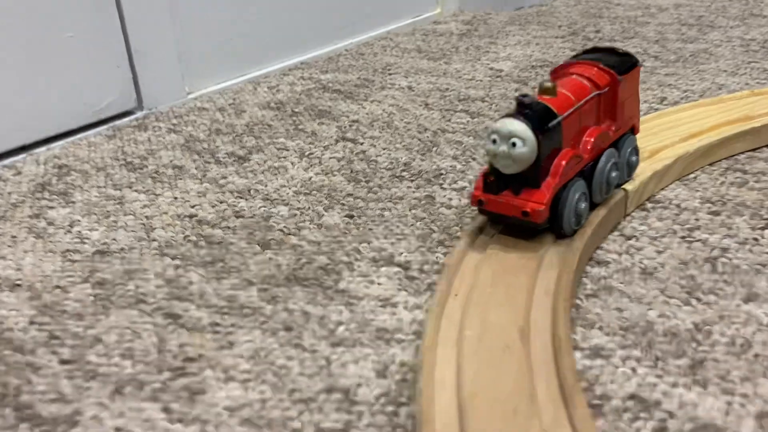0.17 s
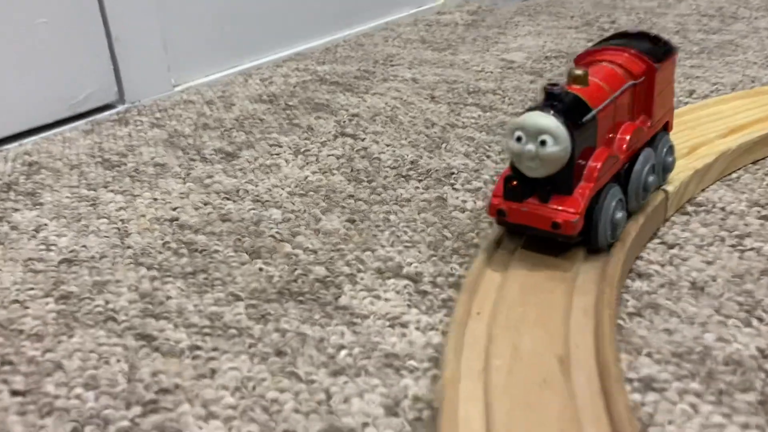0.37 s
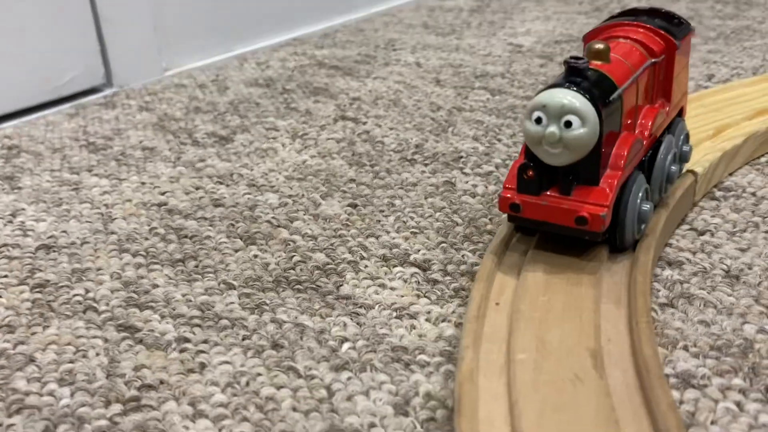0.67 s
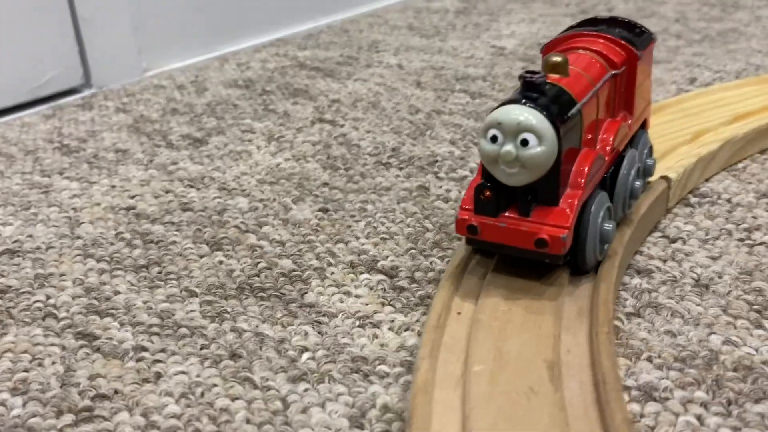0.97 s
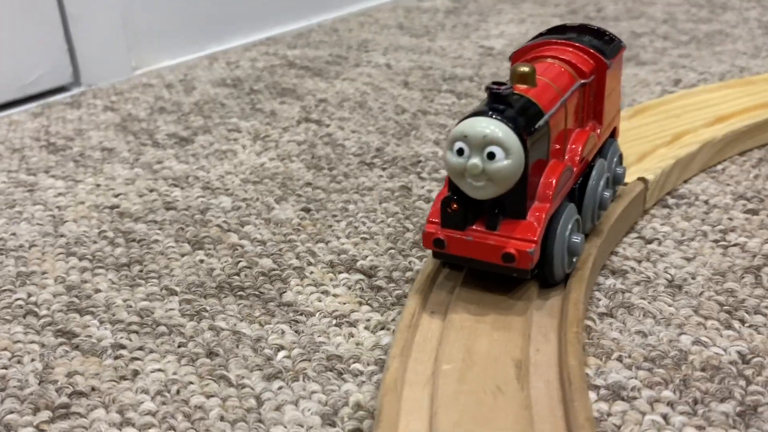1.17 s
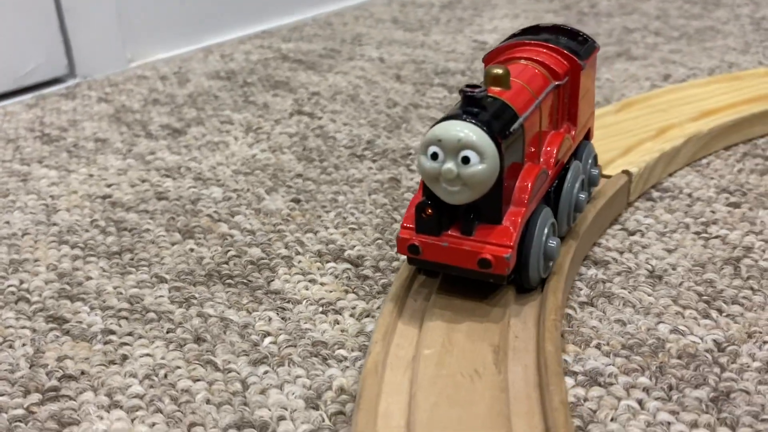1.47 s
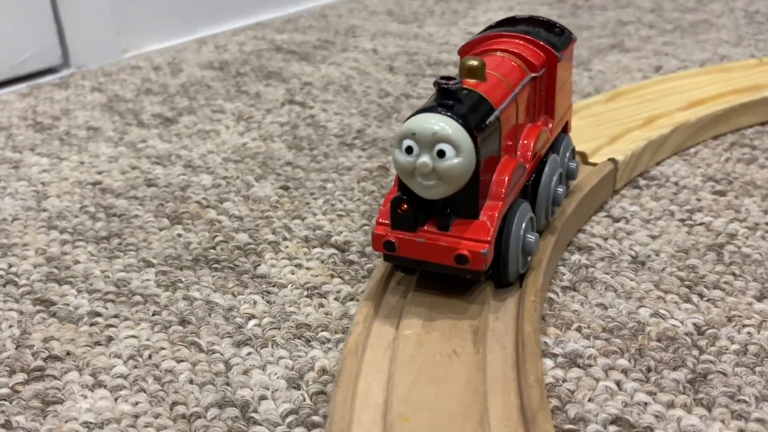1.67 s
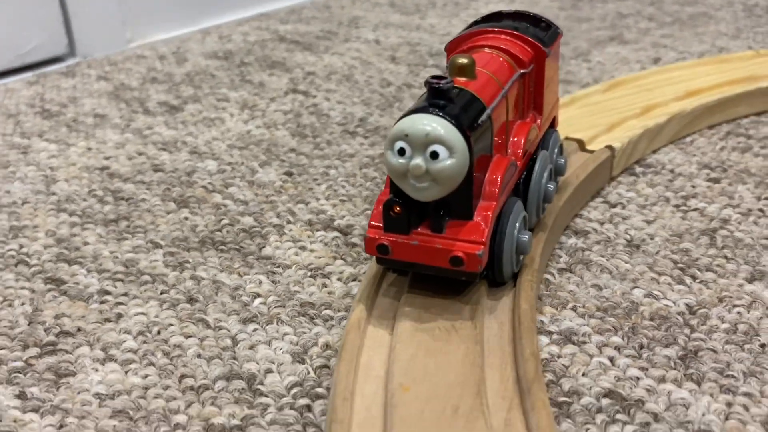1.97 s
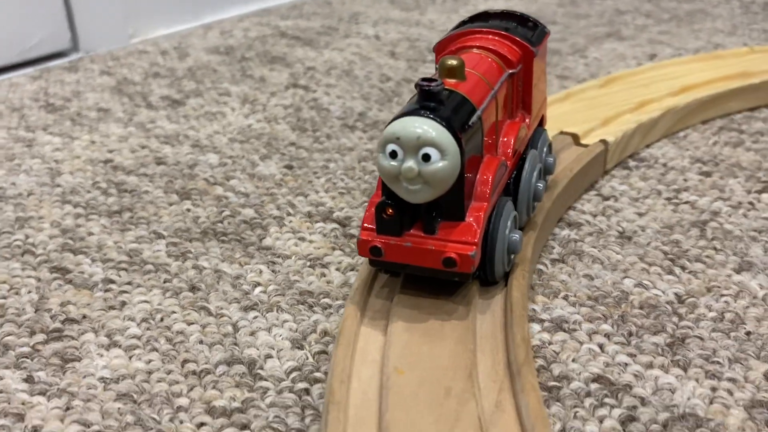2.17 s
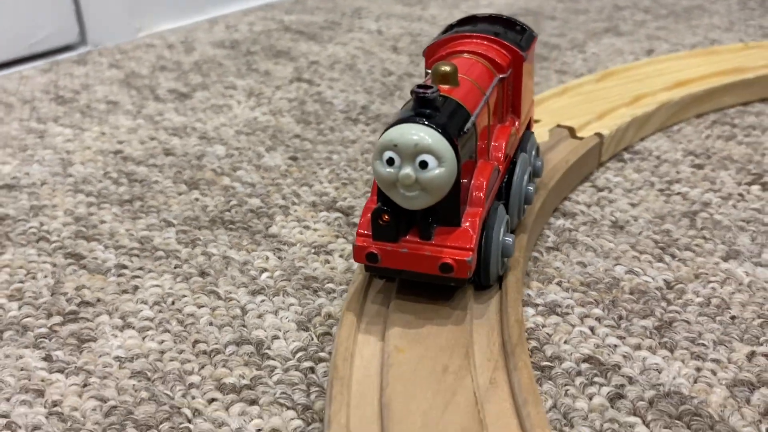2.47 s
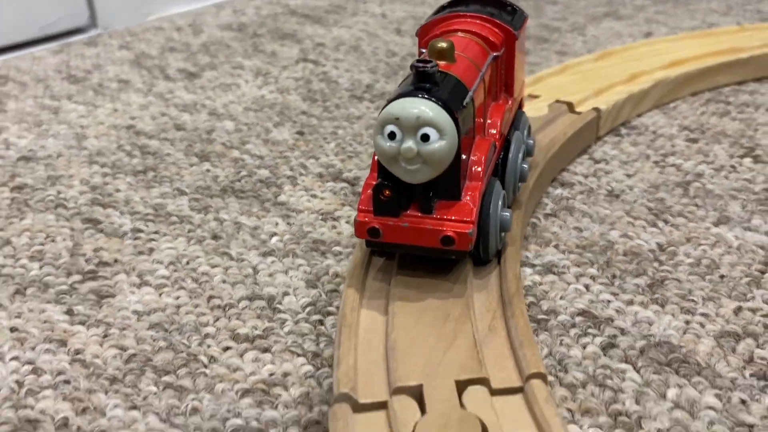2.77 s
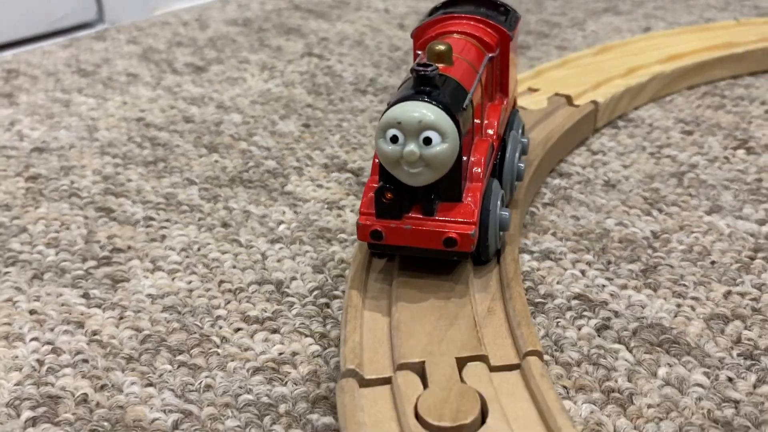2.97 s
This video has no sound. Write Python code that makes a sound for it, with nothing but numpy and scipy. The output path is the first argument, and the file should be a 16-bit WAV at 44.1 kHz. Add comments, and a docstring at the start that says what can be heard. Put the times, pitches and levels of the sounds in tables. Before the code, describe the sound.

A small toy engine's thin motor whir and gritty gear rattle run throughout, swelling early, then ringing brighter later, over soft wheel grumble and low room rumble, heard close from a handheld stereo microphone indoors.

```python
"""On a wooden track laid over carpet, a battery toy engine crawls close to a hand-held stereo camera.
A 24-tooth plastic gear clicks as blows and short scrapes; out of true, it binds twice a turn and chatters.
Tooth-pulsed noise through resonances makes the motor whir in the hollow shell and the chassis rattle.
Wheels grumble as filtered noise and knock as damped tones; hard snaps, dull taps and low bumps
stand out over a low room rumble of shaped noise."""
import sys
import numpy as np
from scipy import signal
from scipy.fft import rfft, irfft, next_fast_len
from scipy.io import wavfile
from scipy.ndimage import uniform_filter1d, map_coordinates

SR = 44100
rng = np.random.default_rng(int(sys.argv[2]) if len(sys.argv) > 2 else 0)


def transcribe(signal):
    """Save signal, clipped to [-1, 1], as a 16-bit WAV file at the path in sys.argv[1]."""
    frames = np.atleast_2d(signal).T
    limited = np.clip(frames, -1, 1)
    pcm = np.round(limited * 32767).astype(np.int16)
    wavfile.write(sys.argv[1], SR, pcm)


N = 137151  # length in samples


def amp(db):
    """Decibels to linear gain."""
    return 10 ** (np.asarray(db) / 20)


def unit(x):
    """Scale to an rms of 1."""
    return x / np.sqrt(np.mean(x ** 2) + 1e-20)


def along(points, hz):
    """Read (Hz, value) points on a log frequency axis."""
    f, value = np.transpose(points)
    return np.interp(np.log(hz + 1), np.log(f + 1), value)


def curves(rows):
    """One value per sample for each column after the time."""
    seconds, *columns = np.transpose(rows)
    return [np.interp(np.arange(N) / SR, seconds, c) for c in columns]


def wobble(rate):
    """A smooth random curve with rate knots a second."""
    knots = rng.standard_normal(int(N * rate / SR) + 4)
    return map_coordinates(knots, [np.arange(N) * rate / SR])


def filtered(x, response):
    """Shape the spectrum of x by a complex response of frequency."""
    m = next_fast_len(N + SR // 2)
    return irfft(rfft(x, m) * response(np.fft.rfftfreq(m, 1 / SR)), m)[..., :N]


def resonant(peaks):
    """Response of parallel resonances, alternating in sign."""
    def response(f):
        total = 0
        for k, (centre, width, db) in enumerate(peaks):
            band = 1j * f * width / (centre * centre - f * f + 1j * f * width)
            total = total + (-1) ** k * amp(db) * band
        return total
    return response


def twice(peaks):
    """The resonances in series with themselves, for steeper skirts."""
    return lambda hz: resonant(peaks)(hz) ** 2


def above(peaks, edge_hz, order=3):
    """The resonances with the bass rolled off below an edge."""
    return lambda hz: resonant(peaks)(hz) * (1j * hz / (edge_hz + 1j * hz)) ** order


def patches(depth_db):
    """White noise pair whose gain varies in patches of time and pitch."""
    z = signal.stft(rng.standard_normal((2, N)), nperseg=1024)[2]
    field = uniform_filter1d(rng.standard_normal(z.shape[1:]), size=4, axis=0)
    field = uniform_filter1d(field, size=4, axis=1)
    return signal.istft(z * amp(depth_db * unit(field)), nperseg=1024)[1][:, :N]


# Drawn phase difference of left over right, which widens and hollows the treble.
# Each row: frequency in Hz, phase difference in radians.
PHASE_SPREAD = [(0, 0.5), (1400, 0.94), (2100, 0.65), (3600, 0.59), (5400, 1.16), (6300, -0.5),
                (7600, 0.58), (8700, -7.5), (9500, -2.5), (10400, -6), (11700, -5), (12700, -16),
                (13900, 13), (14700, -23), (15800, -8)]


def spread_phase(pair):
    """Turn the phase of left by half the drawn difference and of right by minus half."""
    half = lambda hz: .5j * np.interp(hz, *np.transpose(PHASE_SPREAD))
    return filtered(pair, lambda hz: np.exp(half(hz) * [[1], [-1]]))


# Likeness of the noise in left and right.
# Each row: frequency in Hz, left-right correlation from 0 to 1 before the phase spread.
STEREO_LIKENESS = [(60, .8), (600, .8), (1400, .8), (1900, .7), (2400, .9), (4500, .85), (7000, .95),
                   (15000, .93)]


def stereo(gate, colour, patchy_db, blows=0):
    """Gated noise and blows through a colour, rms 1, spread over left and right."""
    def mid_and_side(hz):
        turn = np.arccos(np.clip(along(STEREO_LIKENESS, hz), 0, 1)) / 2
        return colour(hz) * np.array([np.cos(turn), np.sin(turn)])
    source = gate * unit(patches(patchy_db)) + blows * np.array([[1], [0]])  # blows in the middle only
    mid, side = filtered(source, mid_and_side)
    return unit(spread_phase(np.array([mid + side, mid - side])))


# Turns of the gear.
# Each row: mid-turn time in seconds, then levels in dB ahead of the load shaping and panning:
# first bind, second bind, shell ring, chassis rattle.
GEAR_TURNS = [(0.0253, -56.5, -57, -59.5, -63), (0.102, -54.5, -60, -60, -62), (0.1818, -57, -66, -60, -70),
              (0.2619, -53.5, -77, -58.5, -60.5), (0.3444, -52.5, -57, -59, -55.5),
              (0.4324, -53.5, -46.5, -59.5, -53), (0.535, -51.5, -50, -58.5, -56),
              (0.62, -55.5, -66, -56, -76), (0.7, -50, -73, -58, -49.5), (0.7783, -50.5, -53, -56, -59),
              (0.8593, -47, -45.5, -59, -53.5), (0.9431, -51, -45.5, -55.5, -62),
              (1.026, -48, -45, -53, -53), (1.1148, -51.5, -44.5, -52.5, -57),
              (1.2057, -51, -48, -50.5, -56), (1.293, -52.5, -43.5, -50, -53.5),
              (1.3806, -54, -54.5, -49.5, -59.5), (1.4675, -53, -53.0, -50, -58),
              (1.5542, -53.5, -61, -52.5, -57), (1.642, -56, -55, -48.5, -55.5),
              (1.7216, -53.5, -49.5, -49.0, -54), (1.8056, -54.5, -48, -48, -69),
              (1.8884, -52.5, -60, -44.5, -57), (1.9678, -53.5, -48, -47.5, -63),
              (2.0481, -52, -49, -45.5, -58.5), (2.1295, -51, -53, -44.5, -64),
              (2.212, -50.5, -58, -46, -68), (2.294, -50, -49, -46.5, -52.5),
              (2.3792, -52, -51, -48.5, -55.5), (2.4623, -50, -61, -46.5, -54),
              (2.5465, -53.5, -43.5, -48.5, -55.0), (2.6342, -49, -52, -49.5, -51.5),
              (2.7221, -53, -40.5, -55, -55.5), (2.8125, -55.5, -46, -52.5, -55.0),
              (2.904, -55, -54, -53, -51), (2.9999, -55.5, -58, -52, -53.5),
              (3.097, -57.0, -45, -53.5, -58.5)]
TEETH = 24


def gear():
    """Gear angle in turns for each sample, running on evenly before and after the table."""
    s = np.transpose(GEAR_TURNS)[0]
    s = np.r_[2 * s[0] - s[1], s, 2 * s[-1] - s[-2]]
    return np.interp(np.arange(N) / SR, s, np.arange(len(s)) - 1)


def by_turn(turns, db):
    """Glide a level from one mid-turn to the next."""
    return np.interp(turns, np.arange(len(db)), db)


JITTER, SCATTER_DB = .07, 3  # spread of timing in teeth, spread of size
SCRAPE_S, BLUR_DB = 0.00059, -8  # time scale of a scrape, steady rub between clicks
STRIKE_DB, SOFT_HZ = 6, 7100  # drive of the blows, corner above which they soften


def clicks(turns):
    """Each tooth lands with a blow and a short scrape, a little uneven in time and size."""
    tooth = np.arange(np.ceil(turns[0] * TEETH), turns[-1] * TEETH)
    chance = rng.standard_normal((len(tooth), 2))
    at = np.interp((tooth + JITTER * chance[:, 0]) / TEETH, turns, np.arange(N)).astype(int)
    train = np.bincount(at, amp(SCATTER_DB * chance[:, 1]), N)
    u = np.arange(SR // 100) / (SR * SCRAPE_S)
    scrape_shape = u * np.exp(1 - 2 * u) * 2
    scrape = signal.fftconvolve(train, scrape_shape)[:N] + amp(BLUR_DB)
    soft = filtered(unit(train), lambda hz: 1 / (1 + 1j * hz / SOFT_HZ) ** 2)
    return unit(scrape), amp(STRIKE_DB) * soft


BIND_AT, BIND_WIDE = (-.17, 0.15), (0.072, 0.04)  # the two tight spots, in turns from mid-turn


def tight_spots(angle):
    """Two bumps a turn where the untrue gear binds."""
    return [np.exp(-np.abs((angle - at) / wide) ** 3) for at, wide in zip(BIND_AT, BIND_WIDE)]


LOAD_FROM, LOAD_TO, LOAD_EDGE = -0.3, 0.29, 0.022  # loaded part of a turn, in turns from mid-turn


def load(angle):
    """Near 1 while the gear is loaded, near 0 while it is slack."""
    rise = 1 / (1 + np.exp((LOAD_FROM - angle) / LOAD_EDGE * 2))
    return rise / (1 + np.exp((angle - LOAD_TO) / LOAD_EDGE * 2))


# Treble ring of the shell.
# Each row: centre in Hz, width in Hz of one pass, level in dB of one pass; two passes are made.
SHELL_RING = [(5050, 665, -3), (5520, 545, 1.5), (6095, 880, -3)]
SLACK_RING_DB = -4  # drop of the ring in the slack part of the turn


def shell(turns, loaded, teeth, blows):
    """The teeth drive the shell's resonances, harder under load."""
    level = amp(by_turn(turns, np.transpose(GEAR_TURNS)[3]) + SLACK_RING_DB * (1 - loaded))
    return level * stereo(teeth, twice(SHELL_RING), patchy_db=4.5, blows=blows)


# What the binding teeth ring.
# Each row: centre in Hz, width in Hz, level in dB ahead of the bass roll-off.
CHATTER_RING = [(1520, 1200, -18), (2160, 1170, -13.5), (3560, 930, -9), (6110, 550, -0.5),
                (7000, 553, -0.5), (8100, 157, 3.5), (10050, 510, -6.5), (10970, 670, -4.5),
                (11460, 670, -7), (16300, 970, -14)]
FREE_DB = -5.5  # teeth outside the tight spots, against the first bind, ahead of the load weighting


def chatter(turns, row, bump, loaded, teeth, blows):
    """Teeth rattle through plastic resonances and swell at the two tight spots."""
    _, first, second, _, _ = np.transpose(GEAR_TURNS)
    bind = amp(first[row]) * bump[0] + amp(second[row]) * bump[1]
    free = amp(by_turn(turns, first) + FREE_DB) * (0.9 + loaded)
    ring = stereo(teeth, above(CHATTER_RING, edge_hz=3600), patchy_db=3.5, blows=blows)
    return (bind + free) * ring


# Chassis resonances.
# Each row: centre in Hz, width in Hz of one pass, level in dB of one pass; two passes are made.
CHASSIS_RING = [(3783, 290, 4), (4543, 270, 5)]


def chassis(row, bump, teeth, blows):
    """The teeth shake two chassis resonances, mostly at the first bind."""
    level = amp(np.transpose(GEAR_TURNS)[4][row]) * (bump[0] + 0.14 * bump[1] + 0.19)
    return level * stereo(teeth, twice(CHASSIS_RING), patchy_db=1.5, blows=blows)


# Broad motor whir.
# Each row: centre in Hz, width in Hz, level in dB ahead of the bass roll-off.
WHIR_BODY = [(1534, 455, -2), (2930, 180, -5.5), (3970, 860, -6.5), (8200, 460, -9.5), (11200, 680, -11),
             (14200, 3700, -60)]
# Lower and upper resonance of the hollow shell.
# Each row: centre in Hz, width in Hz of one pass, level in dB of one pass; two passes are made.
WHIR_HOLLOW = [(2051, 190, 0), (2288, 410, 0)]
# Course of the whir, ahead of its lift.
# Each row: time in seconds, then levels in dB: broad whir, lower resonance, upper resonance.
WHIR_LEVELS = [(0.0, -66, -73.5, -70), (0.21, -61, -74, -66), (0.42, -63.5, -71, -61.5),
               (0.64, -61, -85, -65.5), (0.85, -60, -69, -62), (1.2, -60.5, -70, -65.5),
               (1.33, -61, -72, -66.5), (1.61, -65, -68.5, -67), (1.77, -61, -67.5, -66.5),
               (1.97, -59.5, -68, -65), (2.34, -61.5, -65.5, -67.5), (2.57, -61.5, -66.5, -66.5),
               (2.78, -64.5, -70.5, -66.5), (3.11, -63.5, -71, -66)]
WHIR_PULSE, WHIR_BLOW = 0.57, 0.26  # depth of the tooth beat, share of the tooth blows
WHIR_LIFT_DB, WHIR_LOAD_DB = 2, 2  # steady lift, further rise under load


def whir(loaded, teeth, blows):
    """Noise beating with the teeth, through a broad body and two narrow hollow resonances."""
    beat = 1 + WHIR_PULSE * teeth
    colours = [above(WHIR_BODY, edge_hz=740)] + [twice([peak]) for peak in WHIR_HOLLOW]
    total = 0
    for db, colour in zip(curves(WHIR_LEVELS), colours):
        part = stereo(beat, colour, patchy_db=1.2, blows=WHIR_BLOW * blows)
        total = total + amp(db + 1.8 * wobble(25.1)) * part
    return amp(WHIR_LOAD_DB * loaded + WHIR_LIFT_DB) * total


# Stereo placing of the engine.
# Each row: time in seconds, then gain of left over right in dB: shell ring, chatter, whir and chassis.
ENGINE_PAN = [(0, 15.5, 0.63, 0.8), (.6, 17, 0.43, 0.61), (1.2, 6.5, 0.025, 2), (2, -0.5, 0, 3.5),
              (3.11, 0, 0.49, 3.4)]


def engine():
    """One gear drives the shell ring, the chatter, the chassis rattle and the whir."""
    turns = gear()
    row = np.clip(np.round(turns).astype(int), 0, len(GEAR_TURNS) - 1)
    angle = turns - np.round(turns)
    bump, loaded = tight_spots(angle), load(angle)
    teeth, blows = clicks(turns)
    shell_pan, chatter_pan, whir_pan = [amp(np.array([db, -db]) / 2) for db in curves(ENGINE_PAN)]
    out = shell_pan * shell(turns, loaded, teeth, blows)
    out = out + chatter_pan * chatter(turns, row, bump, loaded, teeth, blows)
    return out + whir_pan * (chassis(row, bump, teeth, blows) + whir(loaded, teeth, blows))


# Course of the wheel grumble. Each row: time in seconds, level in dB ahead of panning.
ROLL_LEVELS = [(0.0, -80.5), (0.42, -74), (0.52, -77), (0.78, -67), (0.89, -61.5), (0.99, -64.5),
               (1.3, -66), (1.5, -75), (1.79, -81.5), (2.03, -73.5), (2.46, -68), (2.78, -73), (2.94, -73),
               (3.11, -112)]
# Resonances of the track. Each row: centre in Hz, width in Hz, level in dB ahead of the treble roll-off.
WOOD_RING = [(213, 135, -4), (360, 67, -3.5), (574, 135, -3.5)]


def grumble():
    """Rolling wheels as unsteady noise through the wood's low resonances."""
    roll_db, = curves(ROLL_LEVELS)
    wood = lambda hz: resonant(WOOD_RING)(hz) / (1 + (hz / 680) ** 8)
    return amp(roll_db + 2.2 * wobble(30.37)) * stereo(1, wood, patchy_db=3.4)


# Spectrum of the room. Each row: frequency in Hz, relative level in dB per Hz.
ROOM_RUMBLE = [(15, -29), (25, -34), (45, -2), (86, -2.5), (150, -4.5), (270, -13), (420, -7.5), (620, -24),
               (760, -16.5), (1100, -20), (1500, -49), (2800, -120)]


def rumble():
    """Steady low room noise with a drawn spectrum."""
    colour = lambda hz: amp(along(ROOM_RUMBLE, hz))
    return amp(-69.5) * stereo(1, colour, patchy_db=3.0)


def rings(rows, t60, rise_s):
    """Damped tones, one for each row of start in seconds, envelope peak in dB, pitch in Hz."""
    out, t = np.zeros(N + SR), np.arange(SR // 4) / SR
    shape = amp(-60 * t / t60) * (1 - np.exp(-t / rise_s))
    for s, db, hz in rows:
        out[round(s * SR):][:len(t)] += amp(db) * shape / shape.max() * np.sin(2 * np.pi * hz * t)
    return out[:N]


# Low bumps. Each row: start in seconds, envelope peak in dB, pitch in Hz.
LOW_BUMPS = [(0.165, -56, 64), (0.619, -51, 90), (0.899, -59, 91.5), (0.969, -54, 83.4), (1.89, -57, 102),
             (2.408, -61, 129), (2.527, -58.5, 113), (2.65, -57, 79)]


def thumps():
    """Soft low bumps as slow-rising damped tones."""
    return rings(LOW_BUMPS, t60=0.051, rise_s=0.027)


# The hardest tooth blows. Each row: start in seconds, envelope peak of the ring in dB, ring pitch in Hz.
HARD_BLOWS = [(0.3267, -44, 5330), (0.417, -45, 5810), (0.5143, -35.5, 7000), (0.6799, -33.5, 7000),
              (0.7582, -35.5, 7030), (0.7684, -38, 6810), (0.8422, -37, 6870), (0.8504, -37.5, 6650),
              (0.9267, -38, 6800), (1.0072, -41, 6700), (1.0415, -32, 6550), (1.0995, -35, 6250),
              (1.1311, -34.5, 6280), (1.2665, -37, 6770), (1.9472, -35, 5310), (1.9547, -34, 5500),
              (2.0345, -32.5, 5260), (2.0487, -38.5, 5920), (2.5538, -32, 6100), (2.6132, -40, 4580),
              (2.6429, -34, 5500), (2.7029, -36.5, 6700), (2.7342, -37.5, 5590), (2.7945, -38, 5400),
              (2.8882, -43, 4470), (2.9832, -47, 4550), (3.0136, -36.5, 6140)]
CRACK_DB = 5  # drive of the crack over the ring


def snaps():
    """Single hard blows: a short ring and a broad crack through the chatter resonances."""
    s, db, _ = np.transpose(HARD_BLOWS)
    impulses = np.bincount((s * SR).astype(int), amp(db), N)
    crack = filtered(impulses, above(CHATTER_RING, edge_hz=3000, order=2))
    return rings(HARD_BLOWS, t60=.006, rise_s=.0005) + amp(CRACK_DB) * crack


# A quick run of dull taps. Each row: start in seconds, envelope peak in dB.
DULL_TAPS = [(0.5911, -51), (0.6, -52), (0.6195, -50), (0.6264, -50), (0.6374, -64), (0.645, -49)]
TAP_HZ = 1460


def taps():
    """Dull taps as very short damped tones on one pitch."""
    rows = [(s, db, TAP_HZ) for s, db in DULL_TAPS]
    return rings(rows, t60=0.0092, rise_s=.0006)


# Wheels on wood. Each row: start in seconds, envelope peak in dB ahead of panning, pitch in Hz.
WHEEL_KNOCKS = [(0.7, -72, 340), (0.762, -57, 590), (1.016, -53.5, 530), (1.043, -54, 380),
                (1.128, -51.5, 558), (1.187, -59.5, 373), (1.216, -56, 504), (1.293, -55, 409),
                (1.391, -60, 422), (2.121, -60.5, 320), (2.337, -63, 460), (2.469, -63, 292),
                (2.647, -62, 620), (2.735, -63.5, 610), (2.92, -62.5, 530)]


def knocks():
    """Wheels knock on the track as short damped tones."""
    return rings(WHEEL_KNOCKS, t60=0.02, rise_s=0.0066)


def scene():
    """The engine, its wheels on the track, the room and the single hits together."""
    track = (grumble() + knocks()) * amp([[.6], [-.6]])  # dB: slightly to the left
    room = rumble() + thumps()
    hits = spread_phase(np.ones((2, 1)) * (snaps() + taps()))
    return engine() + track + room + hits


def record(dry):
    """The camera keeps nothing from its band limit of 15830 Hz upward."""
    return filtered(dry, lambda hz: hz < 15830)


dry = scene()
out = record(dry)
transcribe(out)
```